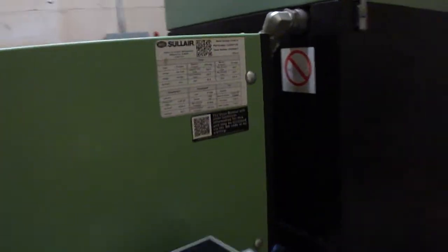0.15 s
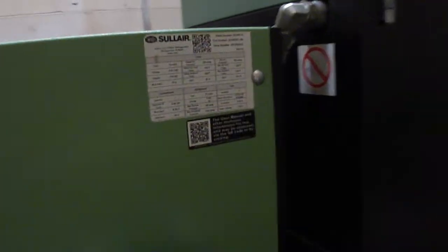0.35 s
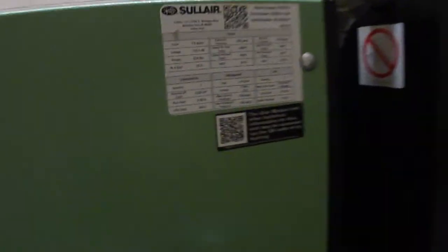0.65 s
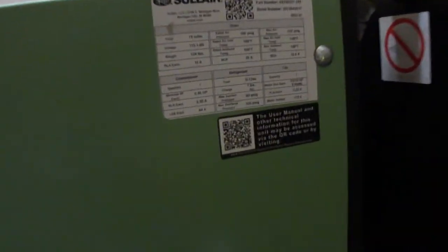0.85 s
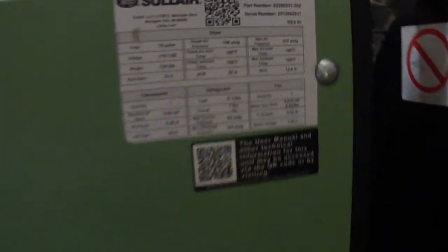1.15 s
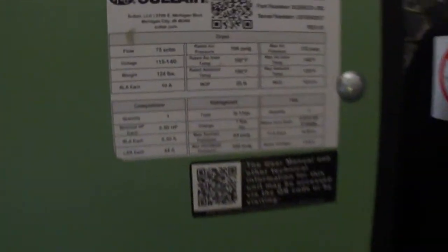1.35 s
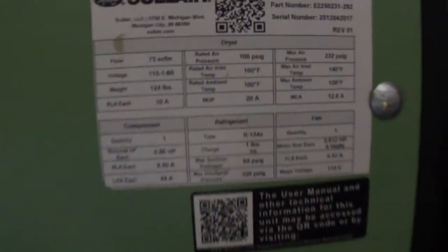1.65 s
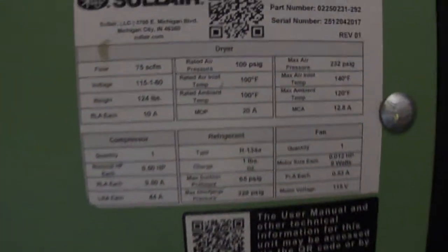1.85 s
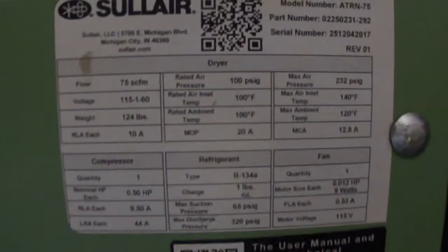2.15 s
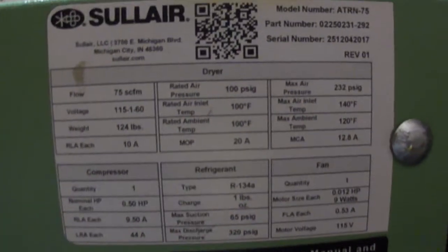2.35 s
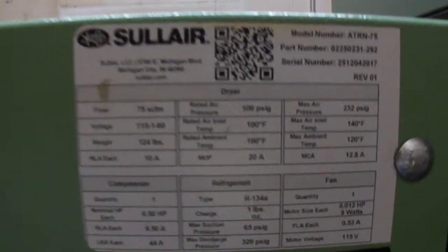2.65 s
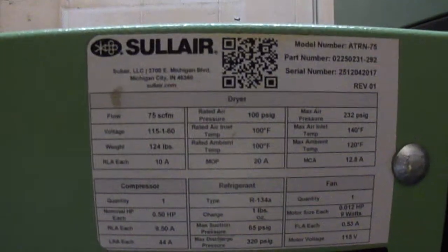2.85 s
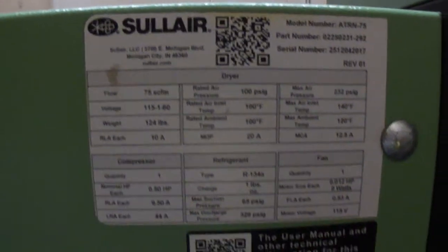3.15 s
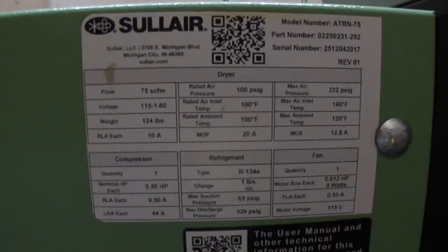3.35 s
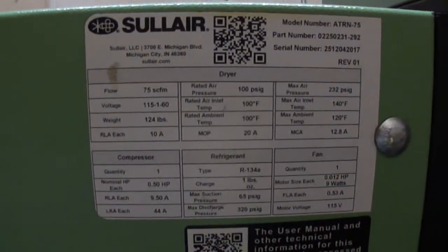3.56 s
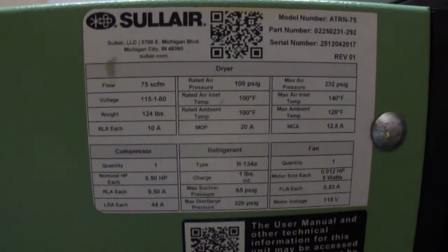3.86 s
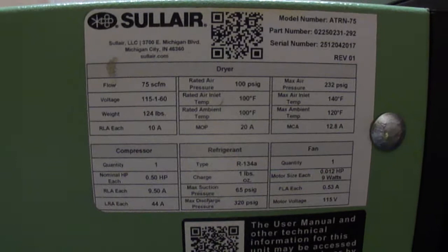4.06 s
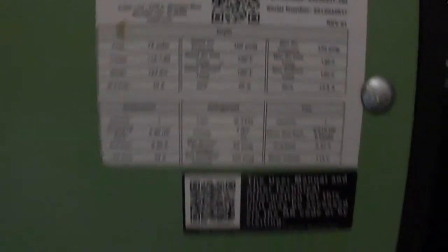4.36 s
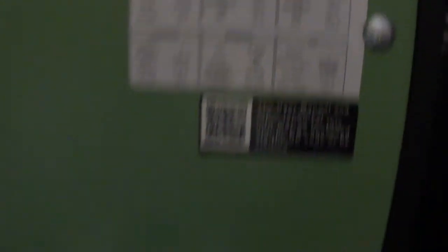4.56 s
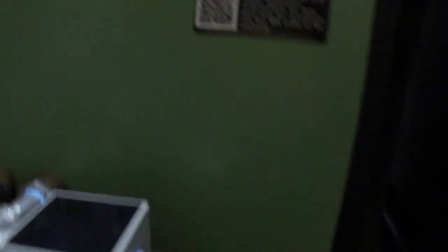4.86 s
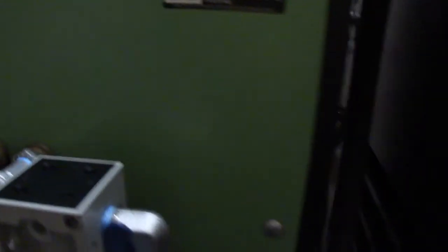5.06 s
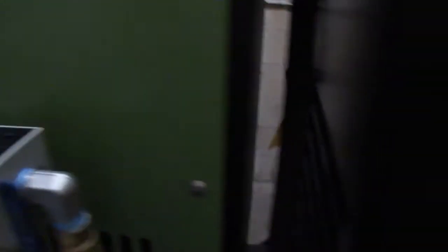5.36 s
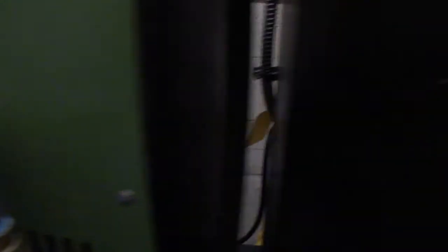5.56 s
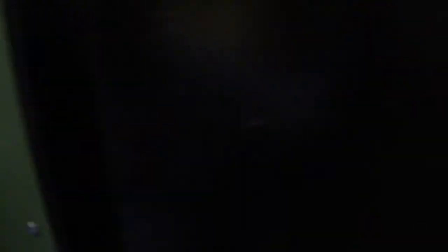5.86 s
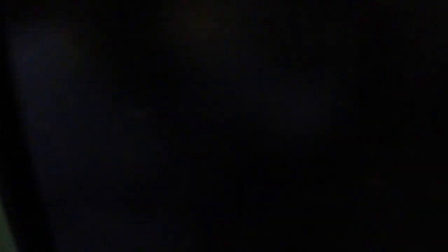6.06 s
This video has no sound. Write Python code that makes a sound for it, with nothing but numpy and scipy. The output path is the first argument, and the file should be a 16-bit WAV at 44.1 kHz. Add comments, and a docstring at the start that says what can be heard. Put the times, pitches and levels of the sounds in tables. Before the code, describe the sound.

In a hard-walled plant room, an air compressor runs at constant speed, at first mostly covered by a loud hiss from its drain valve. The hiss weakens slightly and stops about a third of the way in, with a short echo. What remains is a whine, a hum and the roar of a fan, slowly swelling, with individual tones coming and going as the nearby hand-held microphone moves.

```python
"""A loud hiss of air from a drain valve, over a screw compressor running steadily in a hard-walled room.
After two seconds the valve shuts and the hiss dies away. An automatic gain control then creeps up,
so the whine of the rotors, the hum of the shaft and the roar of the fan swell. A hand-held microphone
moves around the cabinet, which changes the balance of the tones."""
import sys
import numpy as np
from scipy import signal
from scipy.fft import rfft, irfft, next_fast_len
from scipy.io import wavfile
from scipy.ndimage import uniform_filter1d, map_coordinates

SR = 44100
rng = np.random.default_rng(int(sys.argv[2]) if len(sys.argv) > 2 else 0)


def generate_wav(sig):
    """Save sig (samples, or channels by samples) to the path in sys.argv[1] as 16-bit PCM at SR."""
    pcm = np.round(np.clip(np.atleast_2d(sig).T, -1, 1) * 32767).astype(np.int16)
    wavfile.write(sys.argv[1], SR, pcm)


N = 274302
WHINE_HZ, SHAFT_HZ, TOP_HZ = 446.2, 28.205, 11000


def undb(db):
    """Turn decibels into a gain."""
    return np.exp(np.asarray(db) * (np.log(10) / 20))


def curves(table):
    """Turn each column of a time table into a curve with one value per sample."""
    times, *columns = np.transpose(table)
    return [np.interp(np.arange(N) / SR, times, column) for column in columns]


def at_hz(table, hz):
    """Read between (f/Hz, value) points, with octaves evenly spaced."""
    freqs, values = np.transpose(table)
    return np.interp(np.log(hz), np.log(freqs), values)


def wander(rate):
    """A smooth random curve, about 1 in size, that heads for a new value `rate` times a second."""
    held = np.repeat(rng.standard_normal(int(N / SR * rate) + 2), 16)
    smooth = uniform_filter1d(uniform_filter1d(held, size=16), size=16)
    return 1.3 * np.interp(np.arange(N) * rate * 16 / SR, np.arange(len(held)), smooth)


def noise_bands(colour, rings=()):
    """Shape noise, scale it to strength 1 and hand it out in overlapping half-octave bands."""
    size = next_fast_len(N)
    hz = np.maximum(np.arange(size // 2 + 1) * SR / size, 1.)
    spectrum = rfft(rng.standard_normal(size)) * undb(at_hz(colour, hz))
    for ring_hz, width_hz, ring_db in rings:
        spectrum *= undb(ring_db / (1 + (2 * (hz - ring_hz) / width_hz) ** 2))
    spectrum /= np.std(irfft(spectrum * (hz < TOP_HZ), size))
    for step in range(10, 28):
        share = np.clip(1 - np.abs(2 * np.log2(hz) - step), 0, 1)
        yield 2 ** (step / 2), irfft(spectrum * share, size)[:N]


def tone(hz, db, waver_db, rate, jitter):
    """A wavering tone whose phase shakes a little and slides as its path to the microphone changes."""
    delay_s = .035 * wander(1) / 343  # metres of drift over the speed of sound
    cycles = hz * (np.arange(N) / SR - delay_s)
    phase = 2 * np.pi * (cycles + rng.random()) + jitter * wander(15)
    return np.sqrt(2) * undb(db + waver_db * wander(rate)) * np.sin(phase)


def drain_valve():
    """An air jet weakens as its pressure falls, then shuts; in the room the highest hiss dies first."""
    # tone colour of the jet: f/Hz, relative level/dB
    jet = [(300, -40), (800, -15.5), (1500, -11.5), (2100, -7), (3000, -4), (4500, -0.5), (6500, 0.25),
           (9000, 1.1), (11000, -1.5)]
    # how long the room rings: f/Hz, time to fade by 60 dB/s
    ring_time = [(500, 0.83), (2000, 0.62), (5000, 0.76), (7000, 0.58), (10000, 0.34)]
    weaken_at_s, sag_at_s, shut_at_s = 1.25, 2.13, 2.196
    t = np.arange(N) / SR
    spent = np.clip((t - sag_at_s) / (shut_at_s - sag_at_s), 0, 1)
    level_db = -24.4 - 1.2 * np.maximum(t - weaken_at_s, 0) - 0.42 * spent + .15 * wander(3.86)
    closed_s = np.maximum(t - shut_at_s, 0)
    fading_s = closed_s ** 2 / (closed_s + 0.032)  # the valve takes a moment to seal
    shared_flicker_db = 0.5 * wander(11.48)
    out = 0
    for hz, band in noise_bands(jet):
        thinning_db = 0.5 * spent * np.clip(np.log2(8000 / hz), 0, 1)  # lower bands sag more
        flicker_db = shared_flicker_db + 0.42 * wander(10)
        fade_db = 60 * fading_s / at_hz(ring_time, hz)
        out = out + band * undb(level_db - thinning_db + flicker_db - fade_db)
    return out


def rotor_whine():
    """The meshing rotors whine on one pitch and its next two overtones."""
    # The step up at 2.2-2.4 s stands for the gain recovering after the valve shuts;
    # elsewhere the levels vary with the microphone's position.
    # whine over time: t/s, then level/dB at 1, 2 and 3 times WHINE_HZ
    levels = [(0, -50, -40, -66), (.3, -42, -40.5, -57), (.45, -42, -43, -57), (.6, -46.5, -48, -53),
              (.8, -49, -55, -55), (1.1, -56, -53, -54), (1.4, -49, -44.5, -54), (1.8, -42.5, -43, -53),
              (2.2, -44, -44, -52), (2.4, -41, -41.5, -51.5), (4.2, -40, -41, -50), (4.48, -44, -42, -48.5),
              (4.62, -45.5, -42.5, -48.5), (4.9, -51, -43.5, -48.5), (5.1, -46.5, -40.5, -50),
              (5.33, -43, -38, -67), (5.52, -42.5, -39.5, -54), (5.7, -43.5, -53.5, -50.5),
              (5.85, -46, -48.5, -50.5), (6, -47.5, -47.5, -51), (6.1, -45, -45, -50),
              (6.22, -42, -41.5, -72)]
    return sum(tone(k * WHINE_HZ, db, waver_db=0.87, rate=14, jitter=0.092)
               for k, db in zip((1, 2, 3), curves(levels)))


def shaft_hum():
    """The drive shaft hums at multiples of its turning speed."""
    # hum over time: t/s, then level/dB at 6, 12 and 18 times SHAFT_HZ
    levels = [(0, -65, -52, -57), (.45, -62, -50, -54), (.8, -53.5, -45, -53), (1.2, -52.5, -47.5, -54),
              (2, -54.5, -49.5, -51), (2.25, -56.5, -50.5, -58), (2.8, -51, -46, -56),
              (4.2, -50.5, -44.5, -54), (4.5, -52, -47, -53), (4.7, -51, -45, -52), (5, -52, -48, -54),
              (5.2, -48.5, -49.5, -45), (5.4, -49, -52, -59), (5.62, -47, -67, -46.5),
              (5.9, -50, -50, -44.5), (6.05, -46.5, -44, -45), (6.22, -45, -57, -58)]
    return sum(tone(k * SHAFT_HZ, db, waver_db=1.44, rate=14, jitter=0.06)
               for k, db in zip((6, 12, 18), curves(levels)))


def middle_tones():
    """Higher overtones of rotors and shaft come and go in the room's standing waves."""
    # two multiples of the whine, then eight of the shaft speed: f/Hz
    pitches = (4 * WHINE_HZ, 7 * WHINE_HZ, *(k * SHAFT_HZ for k in (22, 23, 24, 30, 42, 44, 67, 69)))
    # these tones over time: t/s, then level/dB of each pitch
    levels = [(0, -50, -66, -53, -58, -68, -50, -67, -70, -57, -66),
              (.9, -53.5, -62, -52.5, -57, -59, -72, -58, -70, -66, -62),
              (2, -61, -64, -58, -56, -59, -71, -68, -65, -68, -62),
              (2.7, -54.5, -68, -55, -54, -56, -56, -61, -60, -66, -57),
              (3.3, -55, -66, -51, -50, -52, -61, -60, -60, -70, -63),
              (3.7, -56, -68, -52, -48.5, -60, -57, -60, -59, -64, -69),
              (4.1, -54, -68, -50, -53, -50, -62, -63, -59, -58, -65),
              (4.45, -60, -56.5, -50.5, -49, -56, -62, -58, -56.5, -55, -64),
              (4.68, -54, -65, -50, -63, -63, -63, -52, -64, -75, -55),
              (4.899, -54, -57, -49.5, -59, -62, -55, -68, -59, -60, -55.5),
              (5.07, -61, -66, -46, -57, -60, -56, -73, -53, -55, -53),
              (5.3, -73, -62, -50.5, -62, -59, -57, -75, -59.5, -68, -57),
              (5.55, -58, -64, -56, -54, -56, -54, -54, -62, -68, -54),
              (5.7, -62, -68, -70, -54, -53, -63, -65, -59.5, -53, -48.5),
              (5.9, -62, -65, -48, -50, -49, -52, -69, -62, -55, -54),
              (6.22, -61, -66, -51, -57, -51, -48, -63, -69, -60, -53)]
    return sum(tone(hz, db, waver_db=0.35, rate=7, jitter=0.065)
               for hz, db in zip(pitches, curves(levels)))


def faint_tones():
    """Weak tones of the machine, each wavering at random on its own."""
    # rotor overtones: multiple of WHINE_HZ, level/dB
    rotor = {5: -63.5, 6: -65.5, 8: -68, 9: -78, 10: -77, 13: -79, 15: -77, 16: -80, 17: -81}
    # shaft overtones, grouped near multiples of 23 teeth and 6 lobes: multiple of SHAFT_HZ, level/dB
    shaft = {7: -65, 36: -73, 43: -68, 48: -71, 55: -64, 66: -67, 68: -65.5, 70: -72, 88: -73}
    # lone thin tones of the cabinet: f/Hz, level/dB
    cabinet = [(59.5, -87), (951.5, -68), (1671.5, -64), (2617.6, -74), (6206, -80)]
    overtones = [(k * WHINE_HZ, db) for k, db in rotor.items()]
    overtones += [(k * SHAFT_HZ, db) for k, db in shaft.items()]
    return sum(tone(hz, db, waver_db=2.8, rate=2.4, jitter=0.073) for hz, db in overtones + cabinet)


def fan_roar():
    """The fan drives air through the cabinet; every band of the noise flickers a little on its own."""
    # tone colour of the rushing air: f/Hz, relative level/dB
    airflow = [(30, -50), (60, -31), (85, -26.5), (130, -12.5), (200, -10.5), (255, -6.5), (430, -2.5),
               (580, -9.5), (1000, -9.5), (1800, -12), (2200, -16), (3000, -19), (5000, -26.5),
               (11000, -34)]
    # panels and ducts that ring along: f/Hz, width/Hz, boost/dB
    panels = [(680, 167, 4.5), (1180, 67, -1.5), (1720, 270, 1), (2630, 140, 3), (3370, 130, 1)]
    # roar over time: t/s, level/dB, bass change at 200 Hz/dB
    levels = [(0, -44.5, -4), (1, -42, -3.5), (2.15, -44, -3), (2.4, -42.5, -2), (3.6, -40.5, -1),
              (4.25, -41, -2.5), (4.8, -41, -2), (5.1, -40, -2), (5.5, -42, -1), (6, -40.5, -1)]
    level_db, bass_db = curves(levels)
    out = 0
    for hz, band in noise_bands(airflow, panels):
        tilt_db = bass_db * np.clip(-np.log2(hz / 800) / 2, 0, 2)
        out = out + band * undb(level_db + tilt_db + 0.45 * wander(9))
    return out


def panel_echo(sound):
    """Add a faint, short echo off the cabinet's side; its delay drifts as the hand moves."""
    delay_ms = 1.6 + 0.273 * wander(1.5)
    echo = map_coordinates(sound, [np.arange(N) - delay_ms * SR / 1000], order=1, mode="mirror")
    return sound + undb(-19.5) * echo


def gain_control(sound):
    """A gain that drops at once for loud sound and climbs back slowly when it gets quiet."""
    target_db, rise_db_per_s, listen_s = -26, 5.5, 0.049
    treble = signal.sosfilt(signal.butter(1, 1500, "high", fs=SR, output="sos"), sound)
    power = uniform_filter1d(treble ** 2, int(listen_s * SR), mode="reflect")
    loudness_db = 10 * np.log10(power + 1e-12)
    wanted_db = np.clip(target_db - loudness_db, -0.27, 14)
    climb_db = rise_db_per_s * np.arange(N) / SR
    slow_db = climb_db + np.minimum.accumulate(wanted_db - climb_db)
    quick_db = np.clip(0.15 * wanted_db, 0, 1.76)  # a small extra lift that comes at once
    return undb(slow_db + quick_db)


def scene():
    """Machine tones plus rushing air, the same in both channels."""
    tones = rotor_whine() + shaft_hum() + middle_tones() + faint_tones()
    air = panel_echo(fan_roar() + drain_valve())
    return np.tile(tones + air, (2, 1))


def record(dry):
    """The microphone dulls the treble, the gain control acts, and a steep filter cuts above TOP_HZ."""
    dulled = signal.sosfilt(signal.butter(4, 13200, fs=SR, output="sos"), dry)
    top_cut = signal.ellip(20, .2, 80, TOP_HZ, fs=SR, output="sos")
    return signal.sosfilt(top_cut, dulled * gain_control(dry[0]))


dry = scene()
out = record(dry)
generate_wav(out)
```